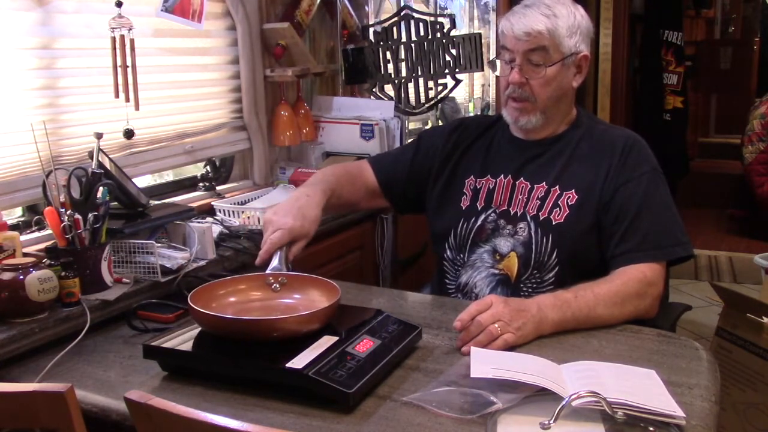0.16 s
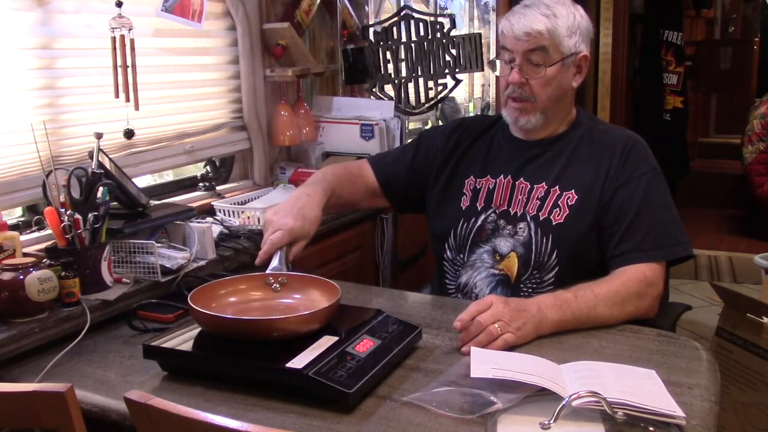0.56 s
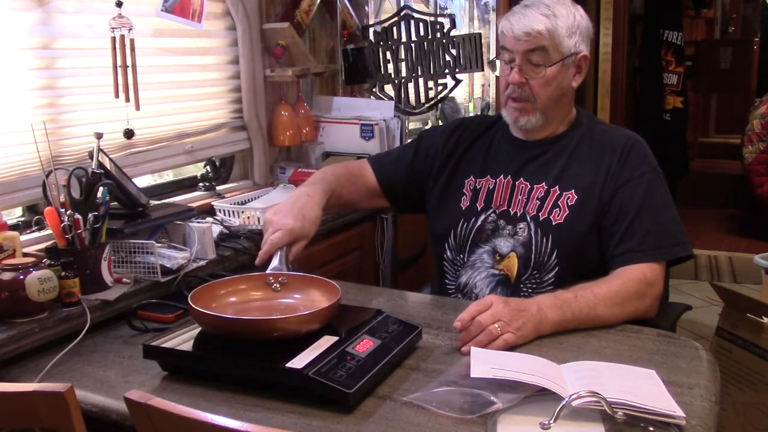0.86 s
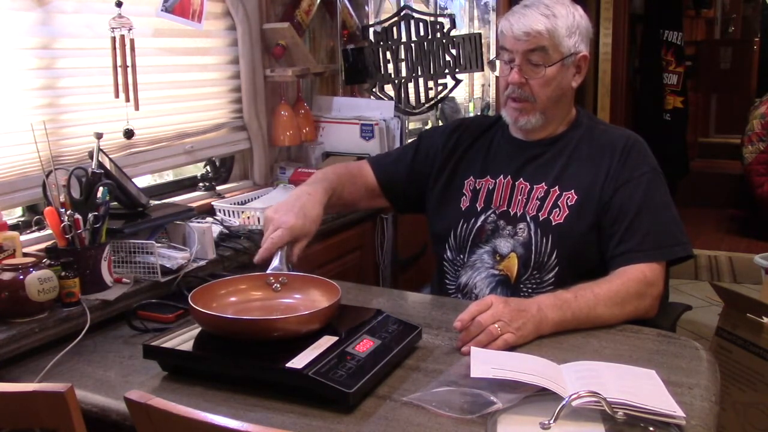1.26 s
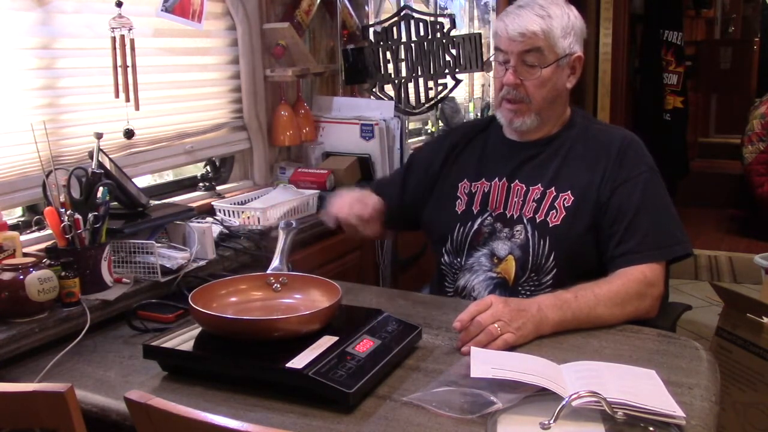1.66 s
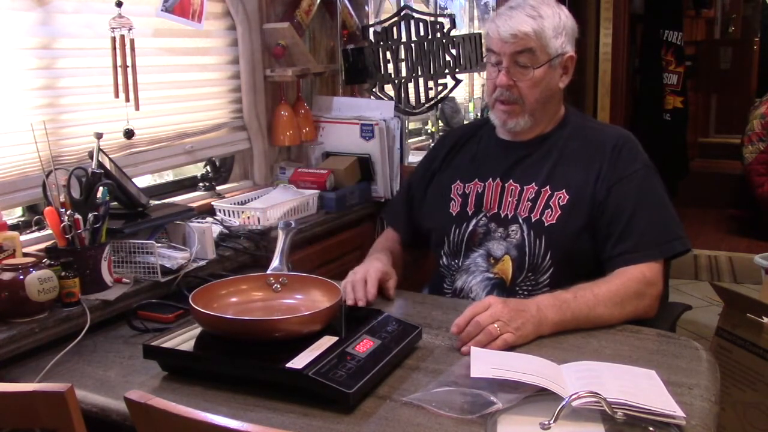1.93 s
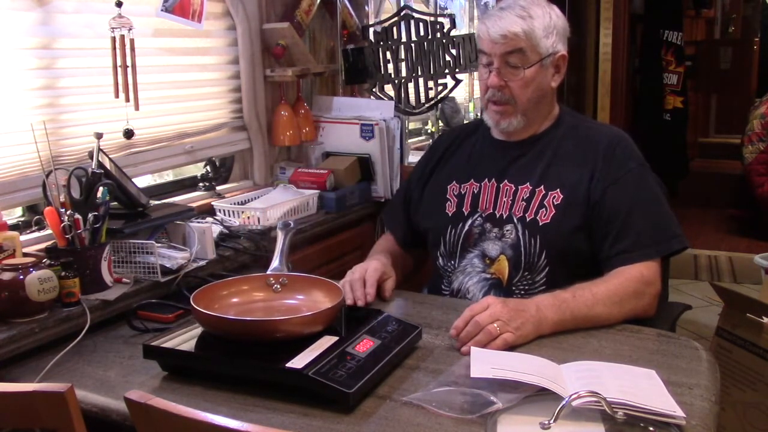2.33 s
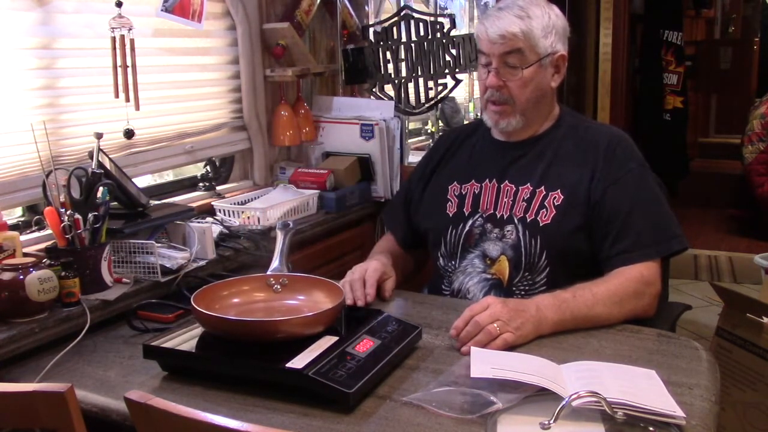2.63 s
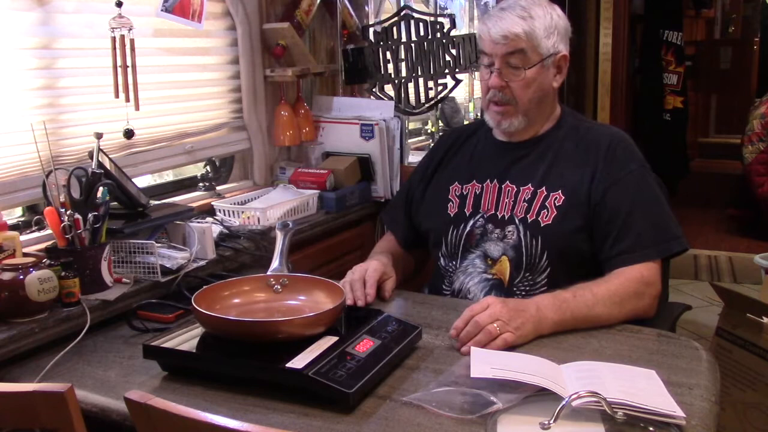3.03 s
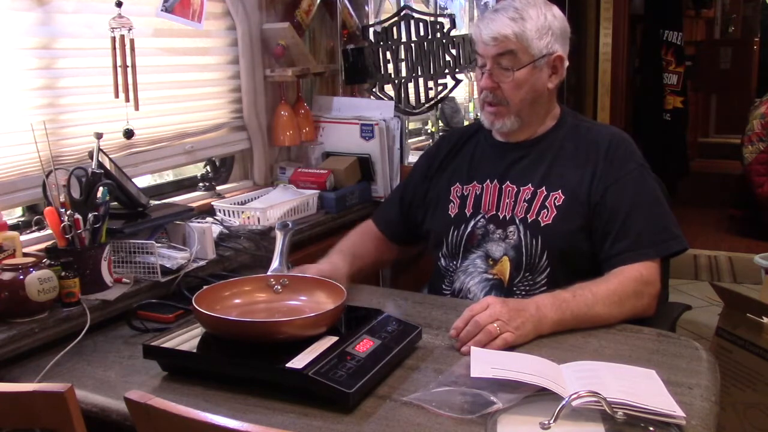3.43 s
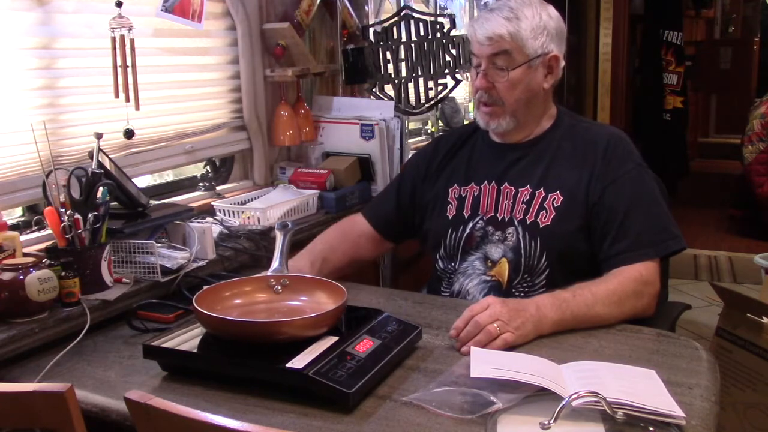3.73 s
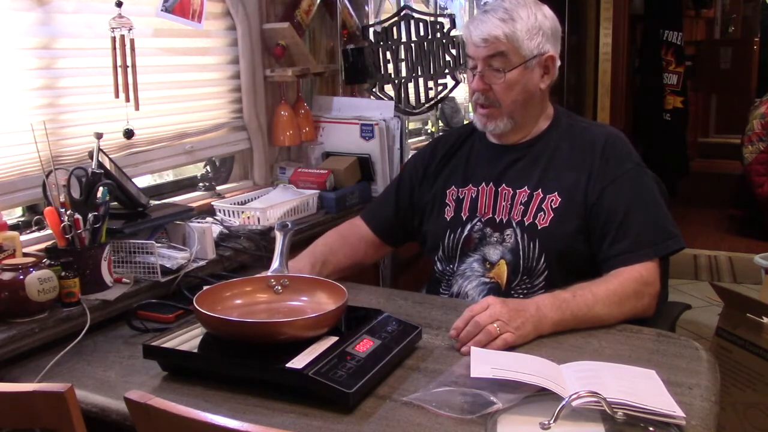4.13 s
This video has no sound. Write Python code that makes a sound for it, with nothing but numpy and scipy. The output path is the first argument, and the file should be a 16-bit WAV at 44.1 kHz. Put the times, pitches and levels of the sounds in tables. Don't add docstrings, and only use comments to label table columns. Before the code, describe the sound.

A close mono microphone in a small living space picks up an electric, insect-like buzz from a metal pan on an induction hob. The thin rim's fizzy high jingle wakes within a second. Around 1.7 seconds the loosened handle begins chattering irregularly, flickering the mid-high colour. Rocking fades by about 3 seconds, leaving a strong, shrill singing with occasional small knocks, over steady low-level fan air and hum.

```python
import sys
import numpy as np
from scipy import signal
from scipy.fft import rfft, irfft
from scipy.io import wavfile
from scipy.ndimage import uniform_filter1d

SR = 44100
rng = np.random.default_rng(int(sys.argv[2]) if len(sys.argv) > 2 else 0)


def level_to_linear(level):
    exponent = np.asarray(level, float) / 20
    return 10 ** exponent


def digitize_waveform(pressure):
    field = np.atleast_2d(pressure).T
    bounded = np.clip(field, -1, 1)
    quanta = np.round(bounded * 32767).astype(np.int16)
    wavfile.write(sys.argv[1], SR, quanta)


N = 189189

TICK_HZ, FIRST_TICK_S = 120.004, 232 / 44100
LET_GO_S = 1.68


def curve(s, values):
    return np.interp(np.arange(N) / SR, s, values)


def walk(rate_hz):
    hold = int(SR / rate_hz)
    steps = np.repeat(rng.standard_normal(N // hold + 1), hold)
    return 1.384 * uniform_filter1d(uniform_filter1d(steps, hold), hold)[:N]


def causal(db):
    cepstrum = irfft(db * np.log(10) / 20)
    cepstrum[len(db) - 1:] = 0
    return 2 * rfft(cepstrum).imag


def ticks(late, jitter_us, scatter_db):
    count = int(N / SR * TICK_HZ) + 1
    chance = rng.standard_normal((count, 2))
    tick_s = FIRST_TICK_S + (np.arange(count) + late) / TICK_HZ + 1e-6 * jitter_us * chance[:, 0]
    at = SR * tick_s
    index = at.astype(int)[:, None] + np.arange(-8, 9)
    gap = index - at[:, None]
    click = np.sinc(gap) * np.cos(np.pi * gap / 18) ** 2
    out = np.zeros(N + SR)
    np.add.at(out, index, level_to_linear(scatter_db * chance[:, 1:]) * click)
    return out[:N]


def ring(force, hz, width_hz):
    pole = np.exp((2j * np.pi * hz - np.pi * width_hz) / SR)
    return 2 * (1 - abs(pole)) ** 2 * signal.lfilter([1], [1, -2 * pole, pole ** 2], force)


BOUNCE_HZ = (1200, 2040, 2520, 2640, 2760, 2880, 3480, 4680, 4920)


def sing(force, modes, gains, width_hz):
    in_step_hz, bounce_lag = 3650, 0.37
    order = np.round(np.array(modes)[:, 0] / TICK_HZ).astype(int)
    mean_db = np.array(modes)[:, 1:].mean(axis=1)
    db = np.interp(np.arange(int(SR / 2 / TICK_HZ) + 1), order, mean_db)
    lead = np.where(order * TICK_HZ < in_step_hz, np.pi, causal(db)[order])
    bounced = np.isin(order, np.round(np.array(BOUNCE_HZ) / TICK_HZ))
    lead = lead - 2 * np.pi * bounce_lag * bounced
    force = np.r_[np.tile(force[:SR // 60], 3), force]
    sound = 0
    for k, phase, gain in zip(order, lead, gains):
        mode = ring(force, k * TICK_HZ, width_hz)[-N:]
        sound = sound + gain * (mode * np.exp(1j * phase)).imag
    return sound * SR / TICK_HZ / np.sqrt(2)


# (frequency [Hz], held by hand [dB], let go [dB], hot [dB])
BASE = [(3720, -53.0, -54.0, -56.0), (3840, -55.0, -50.0, -48.0), (3960, -47.0, -45.0, -43.0),
        (4080, -52.0, -59.0, -55.0), (4200, -50.0, -46.0, -45.0), (4320, -54.0, -51.0, -51.0),
        (4440, -41.0, -42.0, -44.0), (4560, -35.0, -40.0, -35.0), (4680, -35.0, -36.0, -35.0),
        (4800, -31.0, -26.0, -24.0), (4920, -38.0, -38.0, -33.0), (5040, -35.0, -35.0, -32.0),
        (5160, -39.0, -42.0, -42.0), (5280, -36.0, -41.0, -51.0), (5400, -42.0, -41.0, -43.0),
        (5520, -49.0, -45.0, -47.0), (5640, -45.0, -50.0, -52.0), (5760, -39.0, -40.0, -41.0),
        (5880, -53.0, -53.0, -49.0), (6000, -43.0, -40.0, -43.0), (6120, -35.0, -31.0, -31.0),
        (6240, -39.0, -36.0, -44.0), (6360, -48.0, -41.0, -40.0), (6480, -51.0, -49.0, -44.0),
        (6600, -51.0, -57.0, -60.0), (6720, -61.0, -55.0, -52.0), (6840, -48.0, -46.0, -47.0),
        (6960, -62.0, -54.0, -46.0), (7080, -52.0, -52.0, -53.0), (7200, -58.0, -52.0, -53.0)]
STAGE_S = (1.2, 2.2, 3.6)
# (time [s], level [dB])
POWER = [(0.0, -31.5), (0.54, -25.5), (1.64, -24), (1.67, -22), (2.05, -23), (2.77, -20.5), (3.12, -21.5),
         (3.64, -20), (3.7, -21.5), (3.89, -21), (4.29, -22.5)]


def base():
    gains = [level_to_linear(curve(STAGE_S, row[1:]) + 0.9 * walk(2.5)) for row in BASE]
    sound = sing(ticks(0, jitter_us=4.0, scatter_db=0.2), BASE, gains, width_hz=50)
    return sound * level_to_linear(curve(*np.transpose(POWER))) / np.sqrt(sum(g ** 2 for g in gains))


# (frequency [Hz], held by hand [dB], let go [dB], warm [dB], hot [dB])
COIL = [(480, -59.5, -53, -57.5, -55.5), (600, -48, -49, -49.5, -48.5), (1080, -48, -51, -73, -54.5),
        (1200, -48, -45, -52.5, -50), (1320, -57.5, -79, -64, -55), (1560, -50, -52, -57, -56),
        (1800, -62, -62, -89, -79), (1920, -55.5, -48, -59.5, -50), (2040, -50.5, -62, -55, -55),
        (2160, -85, -51, -53, -60), (2280, -76, -62, -71, -62)]
# (frequency [Hz], held by hand [dB], let go [dB], warm [dB], hot [dB])
WALL = [(2880, -62, -60, -50, -48), (3000, -46, -54, -47, -57), (3360, -44, -50, -61, -45),
        (3480, -44, -50, -61, -51), (3600, -62, -62, -53, -54)]
COIL_S = (.6, 1.7, 3.0, 4.15)


def glass():
    rise_db = curve((0, 0.6), (-2.5, 0))
    gains = [level_to_linear(curve(COIL_S, row[1:]) + rise_db + 1.8 * walk(4.0)) for row in COIL + WALL]
    return sing(ticks(0, jitter_us=4.0, scatter_db=0.6), COIL + WALL, gains, width_hz=35)


def contact(modes, share, width_hz, jitter_us):
    held = curve((LET_GO_S - 0.01, LET_GO_S), (1, 0))
    gains = []
    for row in modes:
        rest_db = held * row[1] + (1 - held) * row[-2]
        gains.append(level_to_linear(rest_db + (row[-1] - rest_db) * share + 1.2 * walk(9.0)))
    return sing(ticks(0, jitter_us, scatter_db=-0.6), modes, gains, width_hz)


# (touches [s], lets go [s], contact share [0-1], share of rocking stopped [0-1])
TOUCH = [(1.676, 1.717, 0.6, 0.5), (1.719, 1.786, 0.4, 0.12), (1.79, 1.829, 0.6, .5),
         (1.83, 1.84, 0.4, 0.2), (1.853, 1.936, 0.63, 0.55), (1.947, 1.965, 0.8, 0.3),
         (1.98, 2.016, 0.6, 0.6), (2.044, 2.296, 0.53, 0), (2.588, 2.636, 0.7, .7),
         (2.684, 2.913, 0.68, 0.7), (3.158, 3.302, 0.73, .8), (3.456, 3.534, 0.7, .8),
         (3.564, 3.70, 0.68, 0.7), (3.96, 4.408, 0.53, .8)]


def touching(column):
    t = np.arange(N) / SR
    share = sum(row[column] * ((t >= row[0]) & (t < row[1])) for row in TOUCH)
    return uniform_filter1d(share, size=300)


# (frequency [Hz], settled [dB], rocking [dB])
ROCK = [(3120, -58.0, -44.0), (3240, -53.0, -35.0), (3360, -55.0, -38.0)]
# (time [s], share [0-1])
ROCKING = [
    (0, 0.3),
    (1.2, 0.65),
    (1.3, .95),
    (1.67, 1.03),
    (2.1, 0.87),
    (3.25, 0.03),
]


def rocking():
    free = 1 - uniform_filter1d(touching(-1), size=500)
    return contact(ROCK, curve(*np.transpose(ROCKING)) * free, width_hz=23, jitter_us=2.8)


# (frequency [Hz], held by hand [dB], free [dB], touching [dB])
LOOSE = [(2400, -48, -47, -45), (2520, -46, -53, -41), (2640, -43, -55, -40), (2760, -49, -49, -41),
         (2880, -65, -58, -45)]


def loose_joint():
    level_db = curve((0, 0.57, 0.59, 1.3), (-6, -7, -2, 2))
    return level_to_linear(level_db) * contact(LOOSE, touching(2), width_hz=25, jitter_us=6.0)


# (start [dB], fully awake [dB])
RIM_DB = [(-63, -40), (-69, -42.5), (-67, -39)]
# (time [s], length [s], depth [dB])
SLACK = [
    (1.63, 0.046, 4),
    (1.757, 0.024, 4),
    (1.828, 0.05, 0),
    (1.95, 0.023, 4),
    (2.12, 0.12, 2),
    (2.25, .04, 3),
    (2.488, 0.13, 5),
    (2.89, 0.027, 8),
    (3.1, 0.22, 2.5),
]
SLACK_SHARE = (0.82, 1.1, .2)


def rim_levels():
    t = np.arange(N) / SR
    slack_db = sum(db * np.clip(1 - abs(t - s) / length, 0, 1) for s, length, db in SLACK)
    wake_s = 0.5
    asleep = np.exp(-(t / wake_s) ** 0.93)
    levels_db = []
    for (start_db, full_db), share in zip(RIM_DB, SLACK_SHARE):
        levels_db.append(full_db + (start_db - full_db) * asleep - share * slack_db)
    return levels_db


def jingle(modes, db, first, second, second_db, sizzle_db, hiss_db):
    force = first + level_to_linear(second_db) * second
    sizzle_s = 0.0031
    burst = signal.lfilter([1], [1, -np.exp(-1 / (sizzle_s * SR))], abs(force))
    force = force + (level_to_linear(sizzle_db) * burst + level_to_linear(hiss_db)) * rng.standard_normal(N)
    hz = np.fft.rfftfreq(N + N % 2, 1 / SR)
    power = 0
    for mode_hz, width_hz, gain_db in modes:
        power = power + level_to_linear(2 * gain_db) / (1 + (2 * (hz - mode_hz) / (1.94 * width_hz)) ** 2) ** 2
    response = np.sqrt(power) * np.exp(1j * causal(10 * np.log10(power)))
    sound = irfft(rfft(force, N + N % 2) * response)[:N]
    return level_to_linear(db) * sound / np.std(sound)


# (frequency [Hz], width [Hz], level [dB])
INNER_COOL = [(9290, 90, 2), (8890, 90, 8), (9000, 80, 3), (10070, 180, 0), (9760, 200, -4.5),
              (7860, 500, -8.5), (8350, 500, -12.5)]
# (frequency [Hz], width [Hz], level [dB])
INNER_HOT = [(9120, 90, 10), (8760, 150, 3), (8000, 1200, -10), (7400, 300, -12), (9800, 510, -13),
             (9650, 150, -7)]
# (frequency [Hz], width [Hz], level [dB])
OUTER = [(11720, 88, 12), (11800, 90, -22), (11200, 960, -1), (12350, 300, -19), (13300, 1000, -4.5)]
# (frequency [Hz], width [Hz], level [dB])
EDGE = [(14380, 220, -2), (15200, 250, 0), (15500, 150, -4), (14800, 400, -11), (13800, 500, -13)]


def rim():
    inner_db, outer_db, edge_db = rim_levels()
    hot = curve((2.2, 2.9), (0, 1))
    taps = ticks(0.0149, jitter_us=2.0, scatter_db=1.3), ticks(0.449, jitter_us=2.7, scatter_db=1.8)
    cool_part = jingle(INNER_COOL, inner_db + 0.3, *taps, second_db=-3.5, sizzle_db=-36, hiss_db=-44)
    hot_part = jingle(INNER_HOT, inner_db + 0.6, *taps, second_db=-12, sizzle_db=-39, hiss_db=-45)
    outer = jingle(OUTER, outer_db + 0.41, *taps, second_db=-7, sizzle_db=-30, hiss_db=-40)
    edge = jingle(EDGE, edge_db + 0.1, *taps, second_db=-3, sizzle_db=-18, hiss_db=-28)
    return (1 - hot) * cool_part + hot * hot_part + outer + edge


# (frequency [Hz], density [dB per Hz])
AIR = [(40, -103), (130, -102), (250, -86.5), (440, -68), (510, -76.5), (700, -71.5), (940, -70),
       (1060, -71), (1400, -69), (1750, -68.5), (2200, -75.5), (3600, -76.5), (7500, -79), (13500, -93)]
# (frequency [Hz], level [dB rms])
HUM = [(343.7, -56), (682, -47), (439, -56.5), (1435, -54.5)]


def fan():
    hz = np.maximum(np.fft.rfftfreq(N, 1 / SR), 1)
    air_hz, air_db = np.transpose(AIR)
    colour = level_to_linear(np.interp(np.log(hz), np.log(air_hz), air_db)) * np.sqrt(SR / 2)
    air = 0
    for centre_octave in np.arange(14, 43) / 3:
        share = np.clip(1 - 3 * abs(np.log2(hz) - centre_octave), 0, 1)
        band = irfft(rfft(rng.standard_normal(N)) * colour * np.sqrt(share), N)
        air = air + level_to_linear(1.2 * walk(6.04)) * band
    tones = 0
    for tone_hz, db in HUM:
        phase = 2 * np.pi * np.cumsum(tone_hz * (1 + 0.001964 * walk(7.0))) / SR
        tones = tones + np.sqrt(2) * level_to_linear(db + 0.42 * walk(4.98)) * np.sin(phase)
    return air + tones


def knocks():
    force = np.zeros(N + SR)
    force[(np.array(TOUCH)[:, :2].ravel() * SR).astype(int)] = 1
    return level_to_linear(6.0) * ring(force[:N], 2460, 90).imag


def scene():
    pan = base() + glass() + rocking() + loose_joint() + rim() + knocks()
    return (pan + fan())[None]


def band_limit(x):
    return signal.sosfilt(signal.butter(12, 16790, fs=SR, output="sos"), x)


def record(dry):
    top_hz = 15715
    steep = signal.ellip(12, 0.2, 35, top_hz, fs=SR, output="sos")
    return band_limit(signal.sosfiltfilt(steep, dry))


dry = scene()
out = record(dry)
digitize_waveform(out)
```